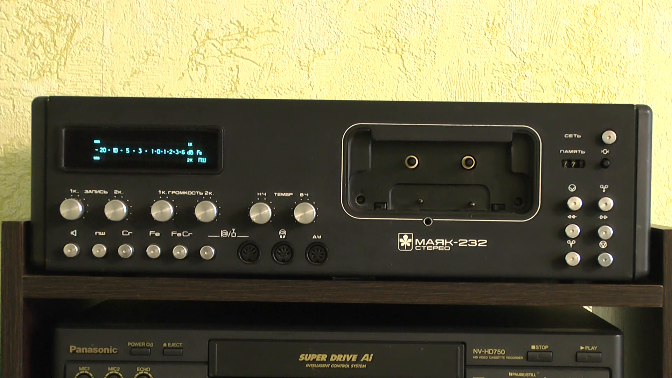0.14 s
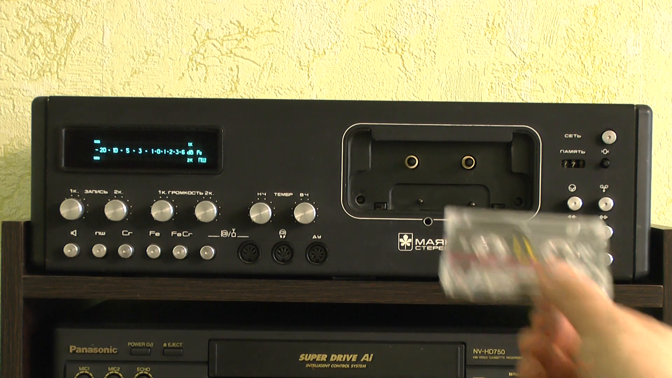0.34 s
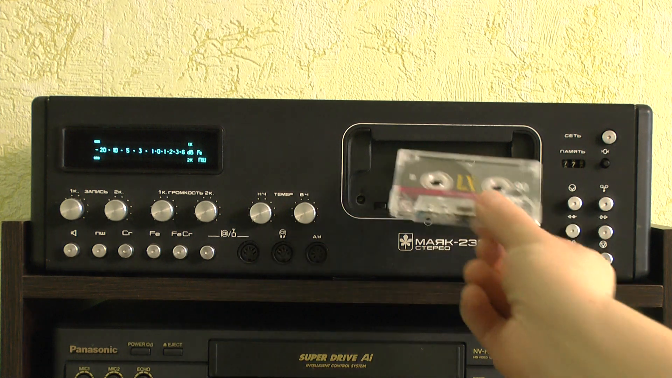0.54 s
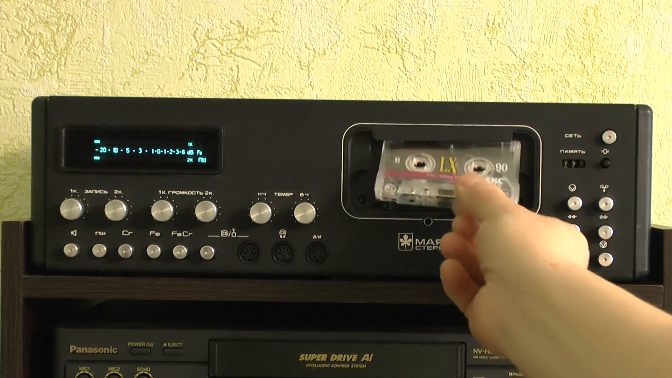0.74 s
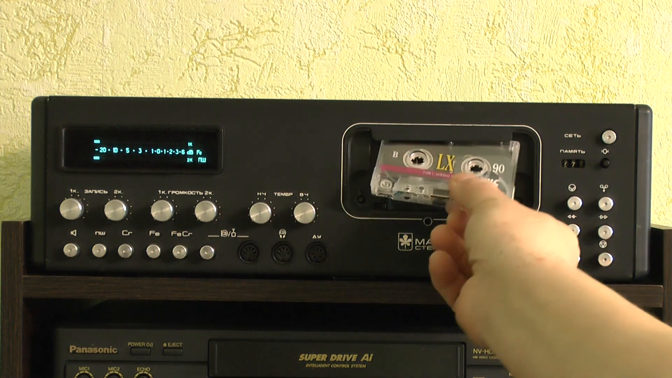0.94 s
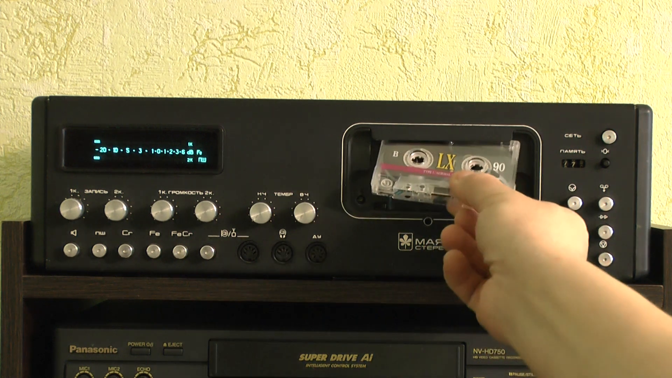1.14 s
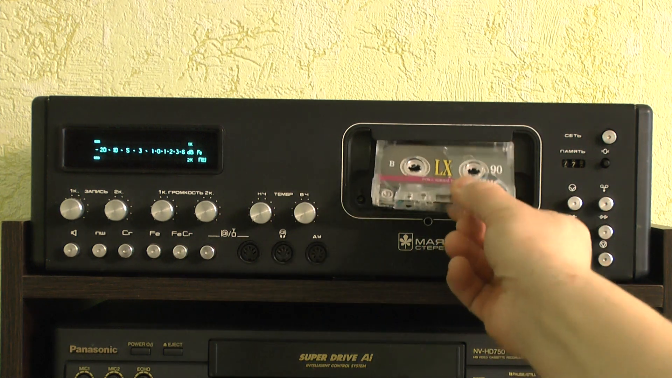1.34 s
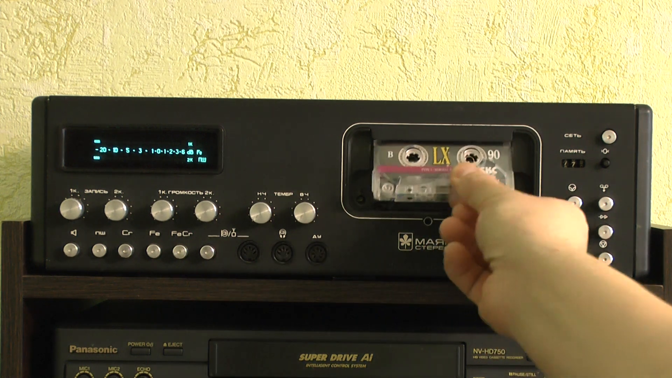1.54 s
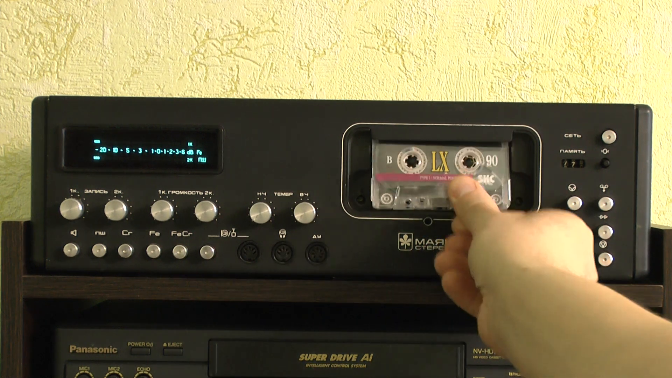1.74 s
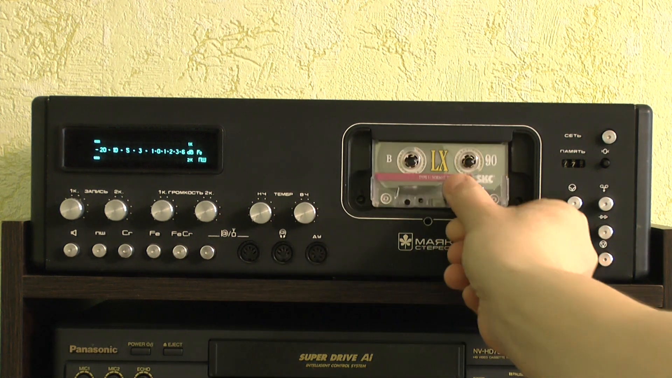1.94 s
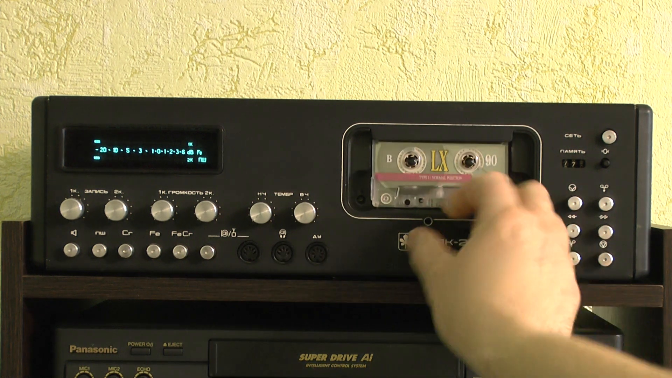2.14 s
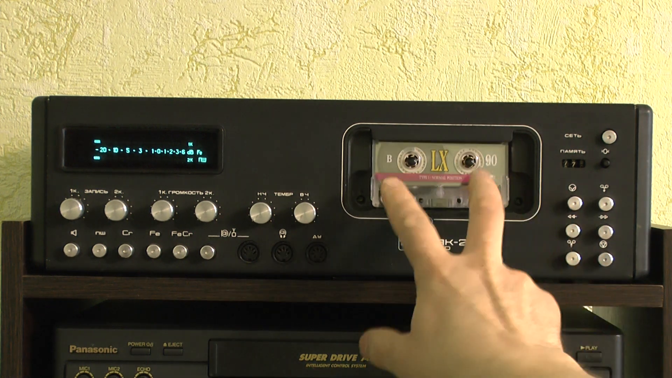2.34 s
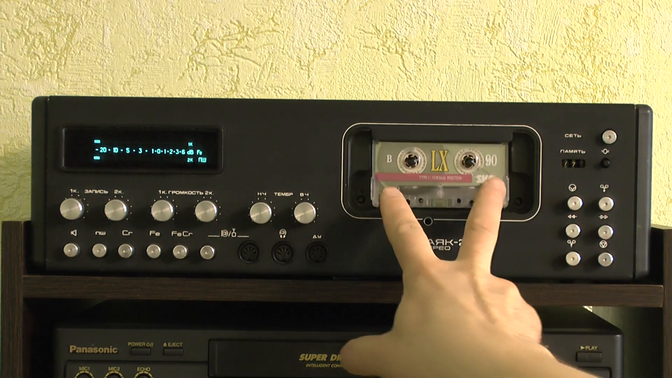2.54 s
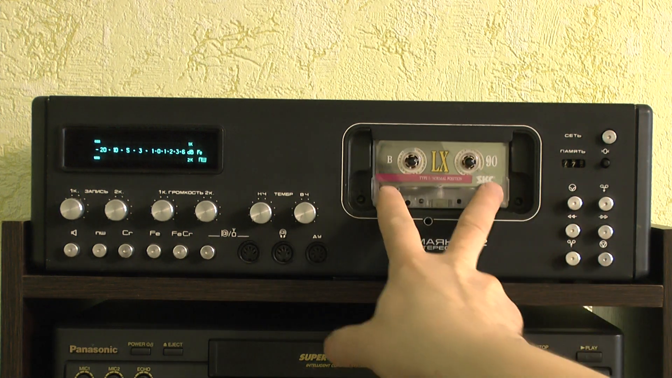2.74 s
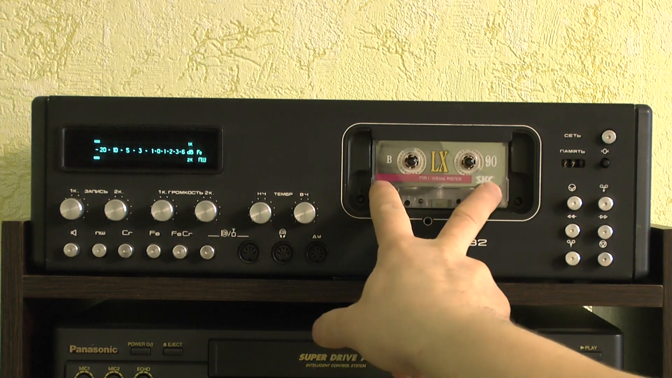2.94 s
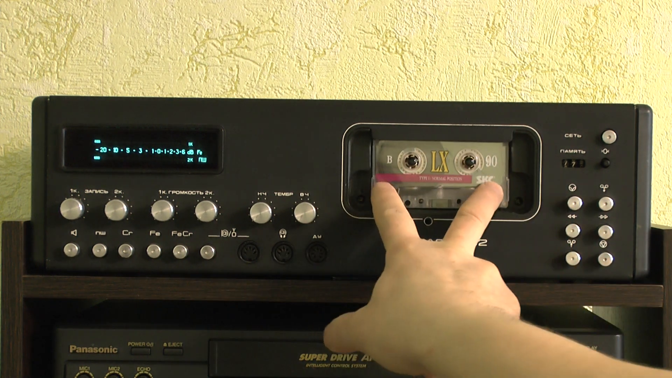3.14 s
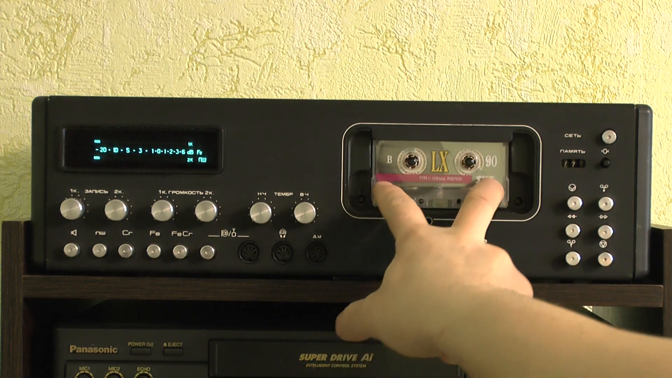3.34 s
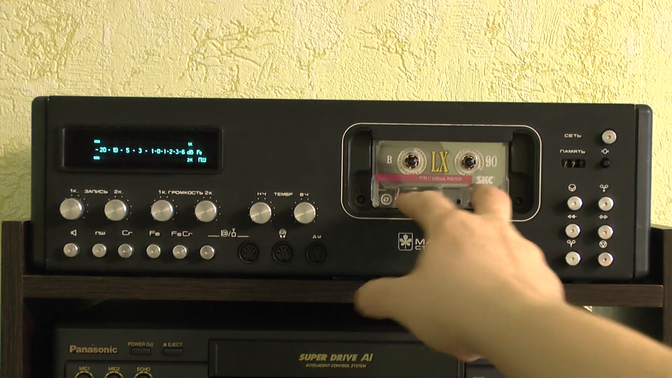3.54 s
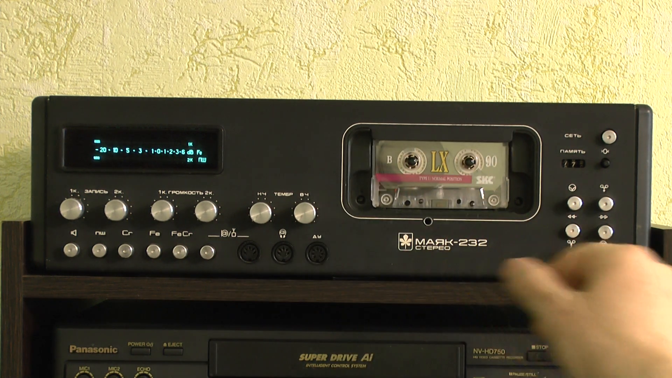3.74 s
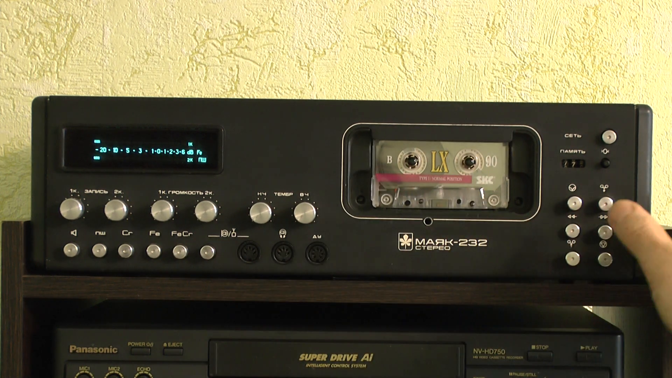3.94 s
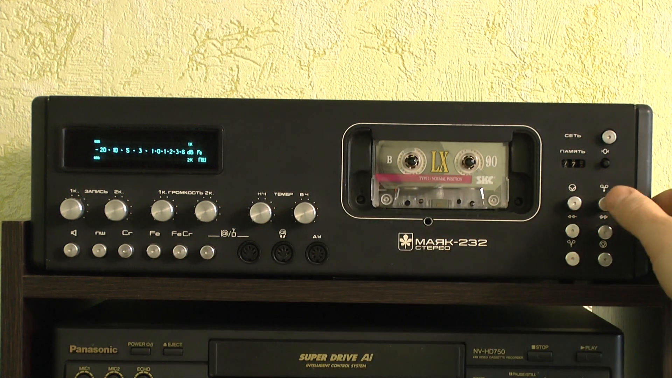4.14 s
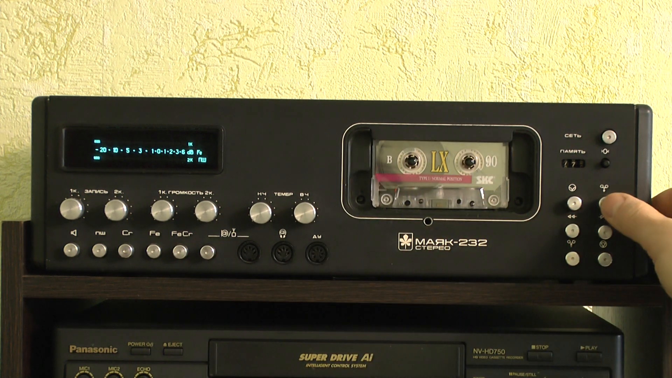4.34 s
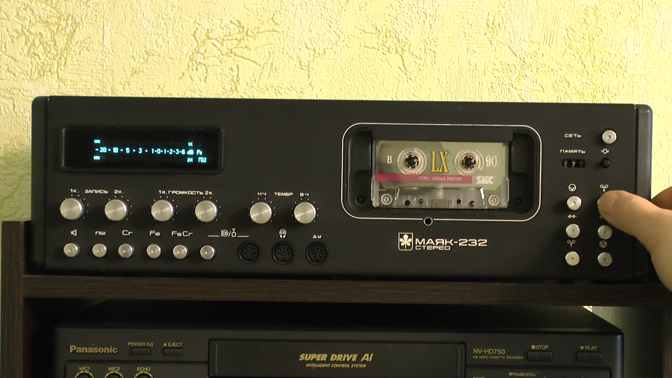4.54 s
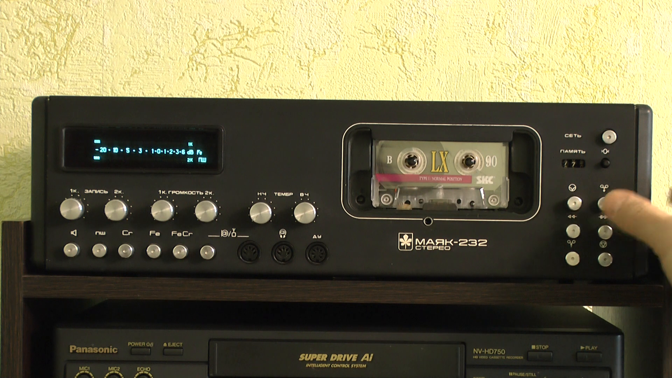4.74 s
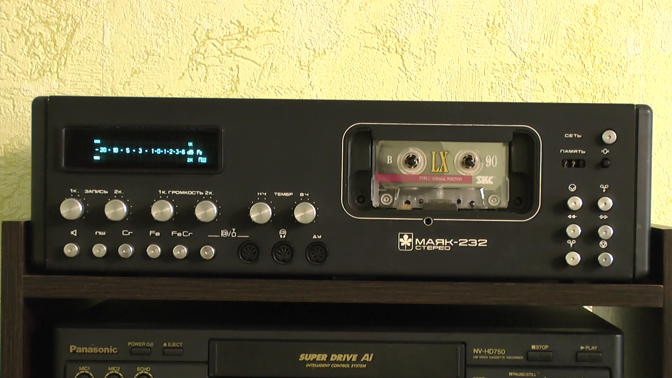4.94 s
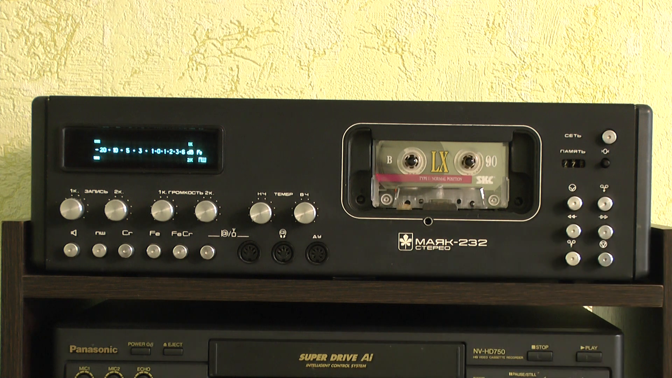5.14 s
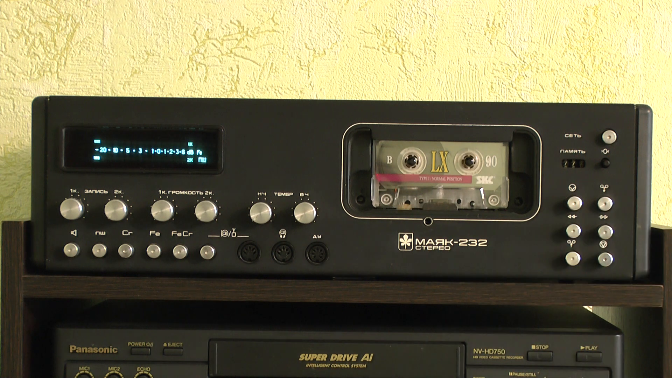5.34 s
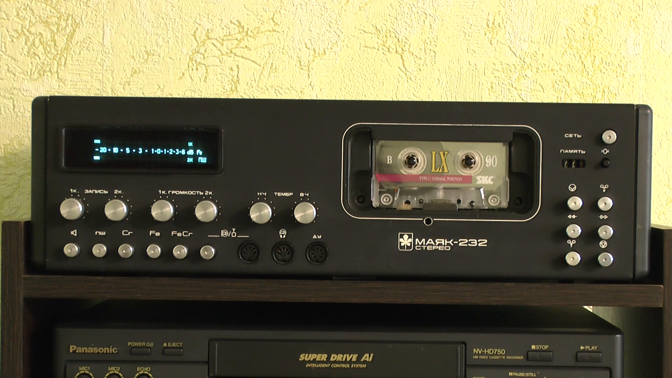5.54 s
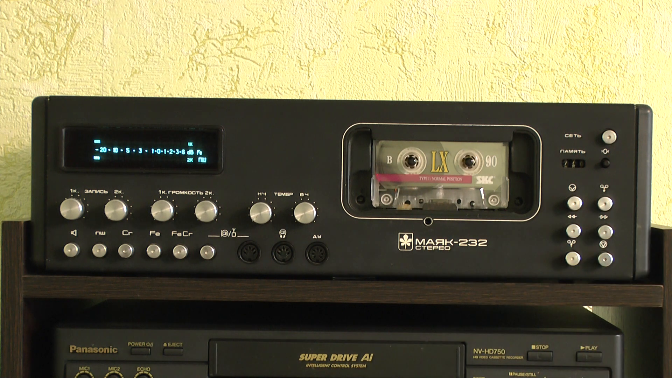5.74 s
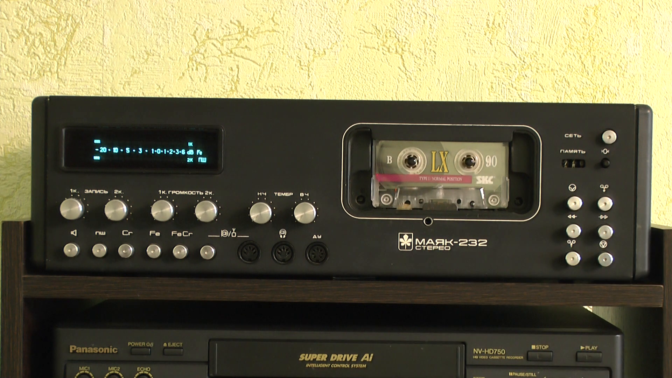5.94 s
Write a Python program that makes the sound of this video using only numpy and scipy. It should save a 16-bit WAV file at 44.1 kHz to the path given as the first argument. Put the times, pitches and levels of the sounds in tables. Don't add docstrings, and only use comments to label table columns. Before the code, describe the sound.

A small furnished room with low murmur and faint steady hiss, heard in stereo from about a metre. In the first half second a sleeve rustles and furniture groans very softly. From 0.7 to 0.95 s a plastic cassette knocks and scrapes against the deck well. More clicks and short slides at 1.1-1.25 s lead to a dense clatter at 1.4-1.6 s, a hard bright double strike near 1.77 s and another knock at 1.95 s, with a thin spring singing in the scrapes. Cloth brushes at 2.1 s; at 2.74 s the shell seats with a sharp clack. A faint motor whine lingers, with a small click at 3.5 s. A soft fingertip tap lands at 4.1 s and settles at 4.27; a latch snaps loudly at 4.46, and a solenoid clunks at 4.76 with a low thump. Sleeve rustle returns around 5.3 s as quiet hum, rumble and tape hiss rise and hold to the end.

```python
import sys
import numpy as np
from scipy import signal
from scipy.fft import rfft, irfft, next_fast_len
from scipy.io import wavfile

SR = 44100
rng = np.random.default_rng(int(sys.argv[2]) if len(sys.argv) > 2 else 0)


def dump(signal):
    limited = np.clip(np.atleast_2d(signal).T, -1, 1)
    pcm = np.round(limited * 32767).astype(np.int16)
    wavfile.write(sys.argv[1], SR, pcm)


def undo_db(level):
    steps = np.asarray(level, float) / 20
    return 10 ** steps


N = 268145

# f/Hz, level/dB per Hz
SHELL = [(100, -52), (170, -9), (322, 3.5), (734, -23), (902, -28), (1500, -57.5), (1670, -8.5), (1870, -1),
         (3610, -4.5), (7930, -10.5), (15000, -26)]
# f/Hz, level/dB per Hz
CHASSIS = [(100, -43), (170, -9.5), (543, 2.5), (954, -13.5), (1980, 0.5), (2180, -0.5), (2670, -1),
           (2880, 1.5), (3230, 1.5), (9930, -5.5), (15000, -14)]
# t/s, swing peak/dB, boom of the furniture/dB
THUMPS = [
    (1.5, -60, -70),
    (1.779, -56, -45.5),
    (1.95, -62, -46.5),
    (2.739, -53.5, -54.5),
    (4.468, -52.5, -44),
    (4.771, -32, -38.5),
]


def rms_one(x):
    return x / np.sqrt(np.mean(x ** 2) + 1e-20)


def at_hz(points, hz, axis=1):
    return np.interp(np.log(hz + 1), np.log(np.array(points)[:, 0]), np.array(points)[:, axis])


def drift(rate):
    return np.interp(np.arange(N) / SR * rate, np.arange(400), rng.standard_normal(400))


def band(x, low_hz, high_hz):
    return signal.sosfilt(signal.butter(2, [low_hz, high_hz], "band", fs=SR, output="sos"), x)


def swells(s, level_db, rise, hold, fall):
    t = np.arange(0, N + 32, 32) / SR
    s, level_db, rise, hold, fall = (np.reshape(v, (-1, 1)) for v in (s, level_db, rise, hold, fall))
    before = (s - t) / np.abs(rise)
    after = (t - s - np.abs(hold)) / np.abs(fall)
    away = np.maximum(np.maximum(before, after), 0)
    return np.interp(np.arange(N) / SR, t, np.max(level_db - 20 * away, axis=0))


def resonances(peaks, size):
    hz = np.arange(size // 2 + 1) * SR / size
    centre, width, level_db = np.array(peaks).T[:, :, None]
    return undo_db(level_db) * 1j * hz * width / (centre ** 2 - hz ** 2 + 1j * hz * width)


def coloured(spectrum, side_db, source=None):
    size = next_fast_len(N)
    hz = np.arange(size // 2 + 1) * SR / size
    white = rng.standard_normal((2, N)) * (1 if source is None else source)
    shape = undo_db(at_hz(spectrum, hz)) * [hz ** 0, undo_db(side_db(hz))]
    mid, side = irfft(rfft(white, size) * shape, size)[:, :N]
    return rms_one(np.array([mid + side, mid - side]))


def floor_side(hz):
    # f/Hz, side minus mid/dB
    width_points = [(60, -21), (110, -8), (200, -14.5), (380, -13), (700, -6.5), (1290, -5.5), (2380, -4),
                    (4400, -15.5), (8120, -9.5), (15000, 0)]
    return at_hz(width_points, hz)


def murmur():
    # f/Hz, level/dB per Hz
    low_floor = [(15, -46), (25, -18), (69, -19.5), (102, -9), (145, -13), (178, -7), (238, -4),
                 (361, -6.5), (396, -36.5), (428, -12), (601, -17.5), (734, -21.5), (1000, -27),
                 (1300, -57), (2200, -120)]
    # t/s, hold/s, level/dB
    moves = [
        (.06, 0.63, -70),
        (0.948, .04, -55.5),
        (1.533, .4, -63.5),
        (1.996, 0.1, -57),
        (2.385, 0.017, -78),
        (2.728, 0.222, -63.5),
        (3.62, .03, -73),
        (4.12, .02, -73),
    ]
    # t/s, hold/s, level/dB
    creaks = [
        (0.038, .005, -59),
        (0.228, .07, -57),
        (0.47, .005, -56.5),
    ]
    upper = coloured([(110, -53.0)] + [p for p in low_floor if p[0] > 130], floor_side)
    building = coloured([p for p in low_floor if p[0] < 160] + [(190, -41)], floor_side)
    moving = coloured([(60, -42), (90, -15.5), (125, -1), (150, -3.0), (190, -41)], floor_side)
    groan = coloured([(380, -31), (415, 9.0), (435, 2.0), (470, -51.0)], floor_side)
    s, hold, db = np.transpose(moves)
    arm = undo_db(swells(s, db, rise=0.15, hold=hold, fall=0.1))
    s, _, db = np.transpose(THUMPS)
    boom_lag_s = 0.075
    boom = undo_db(swells(s + boom_lag_s, db, rise=0.17, hold=0, fall=0.31))
    level = np.sqrt(undo_db(-61.5) ** 2 + boom ** 2 + (undo_db(2) * arm) ** 2)
    s, hold, db = np.transpose(creaks)
    creak = undo_db(swells(s, db, rise=0.07, hold=hold, fall=0.08))
    return level * undo_db(1.66 * drift(4)) * upper + undo_db(-73) * building + arm * moving + creak * groan


def room_air():
    # f/Hz, level/dB per Hz
    high_floor = [(410, -36.5), (700, -24), (912, -13), (1250, -1), (1300, -9), (1720, 1), (2020, -2.5),
                  (2520, -7), (2630, -4), (2840, -4), (3160, -3), (6280, -8.5), (7660, -8), (15000, -16.5),
                  (16500, -35)]
    return undo_db(-69) * coloured([(250, -46)] + high_floor, floor_side)


def sleeve():
    # t/s, peak/dB, rise/s, fall/s (for 20 dB)
    rustle = [(.03, -61.5, .5, 8), (.152, -54.5, .04, -0.1), (.235, -51, 0.19, 0.27),
              (.37, -47, 0.34, 0.17), (.42, -49.5, .2, 0.09), (2.127, -47.5, 0.039, 0.12),
              (2.354, -62.5, .02, 0.2), (2.67, -64, .2, 0.2), (3.4, -72, .4, -4), (3.48, -67, .1, 0.7),
              (4.015, -67.5, 0.033, 0.4), (4.42, -65.5, .08, 0), (5.068, -59.5, 0.12, 0.4),
              (5.344, -51, 0.15, .15), (5.412, -56, .08, 0.24), (5.46, -60.5, .9, 1.3),
              (5.712, -56, 0.083, 0.13), (6.028, -56, 0.43, 2)]
    # f/Hz, level/dB per Hz
    cloth = [(410, 0.5), (700, -4), (1170, -10), (1780, -3), (2160, -3), (2370, -2.5), (3710, -4.5),
             (7600, -9.5), (15000, -28.5)]
    s, db, rise, fall = np.transpose(rustle)
    grain = undo_db(0.5 * drift(46))
    return undo_db(swells(s, db, rise, 0, fall)) * coloured([(200, -61)] + cloth, lambda hz: -9.0 + 0 * hz, grain)


def whine():
    # t/s, hold/s, level/dB, fall/s (for 20 dB)
    motor = [
        (2.22, .3, -70, 2),
        (2.742, .005, -47, -0.08),
        (3.1, 0.34, -66.5, .3),
        (3.461, .06, -68, .18),
    ]
    s, hold, db, fall = np.transpose(motor)
    level_db = swells(s, db, 0.06, hold, fall)
    tone = coloured([(1680, -44), (1750, 0.0), (1790, -8), (1860, -35.0)], floor_side)
    return undo_db(level_db - 6.5) * tone


def playback():
    # f/Hz, level/dB
    mains = [(50, -13), (100, 5), (150, -0.5), (200, -5), (250, -29), (300, -9), (350, -2), (450, -11),
             (550, -23)]
    # f/Hz, level/dB per Hz
    tape = [(18, -50), (30, -41), (102, -1.5), (355, -4.5), (404, -9.5), (448, -10), (597, -7), (645, -38),
            (716, -13), (1200, -19.5), (1920, -17.5), (6360, -18), (15000, -30.5)]
    mute_lifts_s, flutter_db = 5.45, 1.2
    hum_db = swells(mute_lifts_s, -65.5, rise=0.12, hold=N / SR, fall=1)
    rumble_db = swells(mute_lifts_s, -58, rise=0.25, hold=N / SR, fall=1)
    t = np.arange(N) / SR
    hum = np.zeros(N)
    for hz, db in mains:
        hum += undo_db(db + flutter_db * drift(6)) * np.sin(2 * np.pi * (hz * t + rng.random()))
    rumble = coloured([p for p in tape if p[0] < 1000] + [(1500, -76)], floor_side)
    hiss = coloured([(500, -70)] + [p for p in tape if p[0] > 700], floor_side)
    hiss_gain = undo_db(-64.0) * np.clip((t - 5.3) / 0.096, 0, 1)
    return undo_db(hum_db + 5.5) * hum + undo_db(rumble_db) * rumble + hiss_gain * hiss


def thumps():
    t, out = np.arange(4000) / SR, np.zeros(N)
    swing = np.sin(2 * np.pi * 75 * t) * np.exp(-(t / 0.0085) ** 2)
    for s, peak_db, _ in THUMPS:
        out[round(s * SR):][:4000] += undo_db(peak_db + 3.5) * swing
    return band(out, 25, 400) * undo_db([[.4], [-.4]])


def touches():
    # t/s, peak/dB
    landings = [
        (4.113, -37),
        (4.274, -42.5),
        (4.314, -62),
    ]
    t, out = np.arange(6000) / SR, np.zeros(N)
    knock = np.sin(2 * np.pi * 540 * t) * np.exp(-t / 0.012) * np.minimum(t / 0.0044, 1)
    for s, peak_db in landings:
        out[round(s * SR):][:6000] += undo_db(peak_db) * knock
    return out


def slides():
    # t/s, hold/s, scrape/dB, steel spring/dB
    scrapes = [
        (.78, 0.035, -43.5, -41.5),
        (0.822, 0.071, -47.5, -45),
        (1.247, 0.017, -38.5, -37.5),
        (1.398, 0.1, -49, -47.5),
        (1.485, 0.11, -42.5, -41),
        (1.686, 0.0016, -52, -66),
        (1.743, 0.016, -47.5, -56),
    ]
    # f/Hz, width/Hz, level/dB
    pad_spring = [(8250, 81, 18), (8370, 192, -32)]
    s, hold, *levels = np.transpose(scrapes)
    scrape_db, spring_db = (swells(s, db, rise=0.021, hold=hold, fall=0.025) for db in levels)
    slips = (rng.random(N) < 2000 / SR) * undo_db(3.5 * drift(59.06))
    size = next_fast_len(N)
    response = resonances(pad_spring, size).sum(axis=0)
    spring = irfft(rfft(slips * rng.standard_normal(N), size) * response, size)[:N]
    scrape = coloured(SHELL, lambda hz: -14.0 + 0 * hz, slips)
    return undo_db(scrape_db) * scrape + undo_db(spring_db - 4.5) * rms_one(spring)


def hits(events, colour, ring_db, cabinet_db):
    # f/Hz, width/Hz, level/dB
    cabinet = [(261, 67, 1.5), (314, 26.5, 1.5), (503.4, 51, -3.5), (749, 31, -12), (1690, 330, -16.5)]
    size = 4096
    out, t = np.zeros((3, N + size)), np.arange(size) / SR
    centres = np.geomspace(170, 16000, 30)
    plate = resonances([(hz, 0.26 * hz, 0) for hz in centres], size)
    body = np.vstack([plate, resonances(cabinet, size)])
    for s, peak_db, treble_db, body_db, ms, ring_hz in events:
        contacts = rng.standard_normal(size) * (rng.random(size) < .3)
        rattle = rfft(contacts * np.exp(-t * 1000 / max(ms, .3)) * np.minimum(t / 0.00064, 1))
        tilt = [(750, body_db), (1300, 0.00226), (4500, 0.0087), (7000, treble_db), (14000, 1.55 * treble_db)]
        modes = np.vstack([body, resonances([(ring_hz, 160, 0)], size)])
        plate_db = at_hz(colour, centres) + at_hz(tilt, centres) + 10 * np.log10(centres / 1000)
        case_db = [cabinet_db + db + rng.normal(0, 3) + at_hz(tilt, hz) for hz, _, db in cabinet]
        energy = undo_db(np.r_[plate_db, case_db, ring_db]) * (-1) ** np.arange(len(modes))
        struck, spread = modes * rattle, modes * rattle / np.abs(rattle)
        blow, radiated = (irfft(energy / np.linalg.norm(m, axis=1) @ m) for m in (struck, spread))
        radiated *= t < .05
        pan_db = rng.normal(0.27, 0.82)
        gain = undo_db(peak_db) / np.abs(band(blow, 1100, 6800)).max()
        rows = np.array([blow * undo_db(pan_db), blow * undo_db(-pan_db), radiated])
        out[:, round(s * SR):][:, :size] += gain * rows
    return out[:, :N]


def by_kind(*kinds):
    return sorted((s, db, treble, body_db, ms, hz) for rows, body_db in kinds for s, db, treble, ms, hz in rows)


def cassette_knocks():
    # t/s, peak/dB, relative treble/dB, rattle/ms, ringing f/Hz
    flat = [(0.7786, -27.5, -22, 3.4, 1870), (0.8301, -30, 1, 3.2, 3150), (0.8734, -34, 12.5, 7.2, 2550),
            (1.0873, -38.5, -5, 8.2, 1840), (1.2248, -31.5, -37, 5.1, 2300),
            (1.3933, -32.5, -14.5, 1.6, 2830), (1.4955, -26, 3, 13, 2000), (1.5594, -28, -11, 10.6, 1714),
            (2.1231, -35.5, -13, 10, 1730), (2.6888, -47.5, -15, 6, 3140), (2.719, -39, -14, 6, 3810)]
    corner = [
        (0.719, -19, 2.5, 4, 2660),
        (0.7945, -25, -23, 7.3, 3450),
        (1.454, -26.5, -4, 17, 2660),
        (1.5049, -21.5, -29.5, 4.4, 1910),
        (1.7622, -17, -1, 15, 1800),
        (1.95, -19, 8, 11.1, 3550),
        (2.7382, -12, 7.5, 5.1, 2000),
        (2.7603, -18.5, 5, 8.9, 3030),
        (2.8701, -35, 2.5, 11.6, 3550),
    ]
    pins = [(0.1486, -44, -18, 6.5, 3500), (0.9402, -32, 10, 6.1, 6630), (1.2405, -22, 0.5, 18, 2960),
            (1.4335, -32, -15, 25, 1710), (1.5, -15, -3.5, 4, 2540), (1.535, -39, -28, 15, 2110),
            (1.5946, -30, -12.5, 2.7, 3350), (1.6793, -39.5, 10, 6.6, 1890), (1.7718, -13, 5, 17, 2650),
            (1.7806, -17.5, 9.5, 21, 1690), (1.918, -29.5, 3.5, 5, 2600), (2.7295, -29.5, 8, 6, 6900),
            (3.3968, -55.5, -20, 6, 1790), (3.5175, -32.5, 11, 3.2, 2570)]
    return hits(by_kind((flat, 4), (corner, -9), (pins, -24)), SHELL, ring_db=-7.5, cabinet_db=-7.5)


def button_presses():
    # t/s, peak/dB, relative treble/dB, rattle/ms, ringing f/Hz
    presses = [
        (4.1135, -46, 7.5, 5, 2170),
        (4.2617, -48.5, 0.5, 22, 1450),
        (4.3121, -50.5, -9, 4.7, 1450),
    ]
    dull_db_per_oct = 4
    padded = [(hz, db - dull_db_per_oct * np.log2(max(hz / 1500, 1))) for hz, db in CHASSIS]
    return hits(by_kind((presses, 7)), padded, ring_db=-0.5, cabinet_db=-17)


def deck_snaps():
    # t/s, peak/dB, relative treble/dB, rattle/ms, ringing f/Hz
    slams = [
        (4.4624, -10, -3.5, 5.7, 6540),
        (4.4668, -9.5, -1.5, 3, 2550),
        (4.7554, -12.5, -33, 5.3, 7930),
        (4.7731, -8.5, 6, 1.5, 3350),
        (4.7774, -14, 11.5, 2.1, 7550),
    ]
    # t/s, peak/dB, relative treble/dB, rattle/ms, ringing f/Hz
    relay = [
        (4.6884, -46.5, 2, 11, 2500),
        (4.6995, -39.5, -1, 7.2, 6130),
        (4.7517, -12, 8.5, 3.4, 3180),
    ]
    # t/s, peak/dB, ringing f/Hz
    loose = [
        (0.0514, -57, 7000),
        (0.153, -44, 8200),
        (1.559, -39, 8230),
        (1.596, -33, 8200),
        (1.678, -41, 7930),
        (4.515, -31, 6540),
        (4.9177, -46, 7750),
    ]
    # bright, without body, 4.2 ms long
    ticks = [(s, peak_db - 8.5, 12, -30, 4.2, hz) for s, peak_db, hz in loose]
    return hits(by_kind((slams, -6), (relay, -30)) + ticks, CHASSIS, ring_db=-7.5, cabinet_db=-21.5)


def room(x):
    # f/Hz, t60/s, level/dB, side minus mid/dB
    decay = [(148, 0.71, -4.5, -27.5), (287, 0.39, 6, -18.5), (790, 0.49, 9, -14), (1680, 0.5, -1.5, -6),
             (3320, 0.39, 0, -9.5), (5900, 0.29, -0.5, -16.5), (9600, 0.22, -9, -1.5),
             (13000, 0.138, -6, 2.5)]
    t, edges = np.arange(SR) / SR, 100 * 2 ** np.arange(0, 7.6, .5)
    tail = np.zeros((2, SR))
    early = 1 + undo_db(6.5) * np.exp(-t / 0.0052)
    onset = np.clip((t - .0015) / 0.0024, 0, 1)
    for low, high in zip(edges, edges[1:]):
        hz = np.sqrt(low * high)
        fall = undo_db(at_hz(decay, hz, axis=2) - 60 * t / at_hz(decay, hz)) * early * onset
        width = undo_db([[0], [at_hz(decay, hz, axis=3)]])
        tail += band(rng.standard_normal((2, SR)), low, high) * fall * width
    mid, side = signal.fftconvolve(x[None], tail, axes=1)[:, :N]
    return np.array([mid + side, mid - side])


def scene():
    floor = murmur() + room_air()
    sliding, finger = slides(), touches()
    blows = cassette_knocks() + button_presses() + deck_snaps()
    into_room = blows[2] + sliding.mean(axis=0) + undo_db(-8.5) * finger
    tail = undo_db(-33.0) * room(band(into_room, 156, 12000))
    direct = band(blows[:2], 160, 11000) + sliding + finger
    return floor + sleeve() + whine() + playback() + thumps() + direct + tail


def low_pass(x):
    return signal.sosfilt(signal.butter(12, 16990, fs=SR, output="sos"), x)


def record(dry):
    cut = signal.sosfilt(signal.cheby2(12, 42, 16250, fs=SR, output="sos"), dry)
    return low_pass(cut)


dry = scene()
out = record(dry)
dump(out)
```